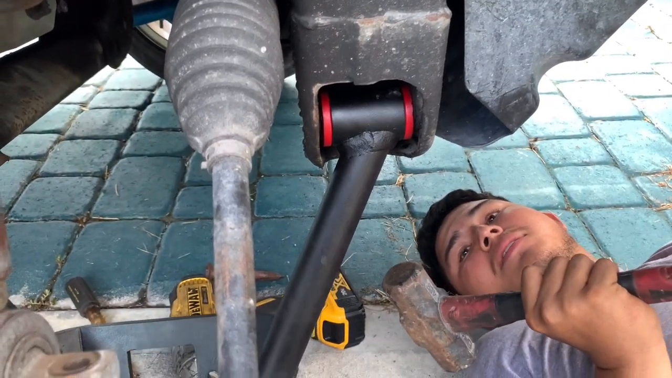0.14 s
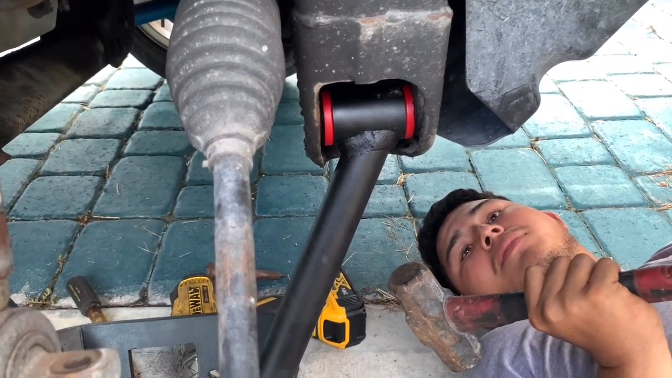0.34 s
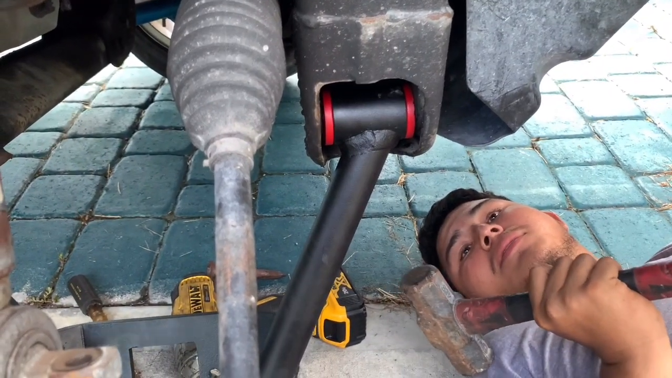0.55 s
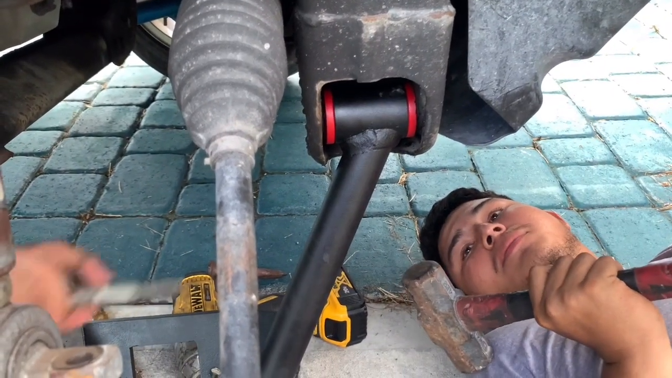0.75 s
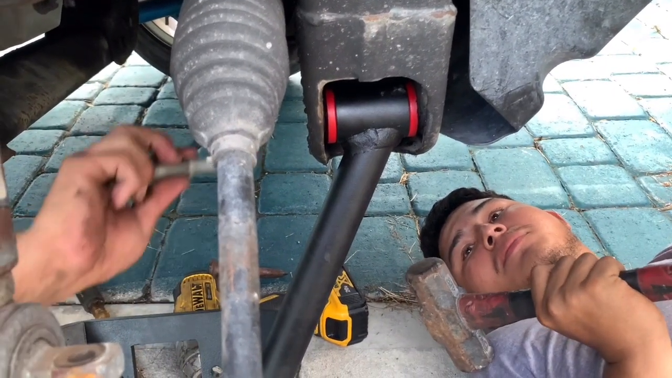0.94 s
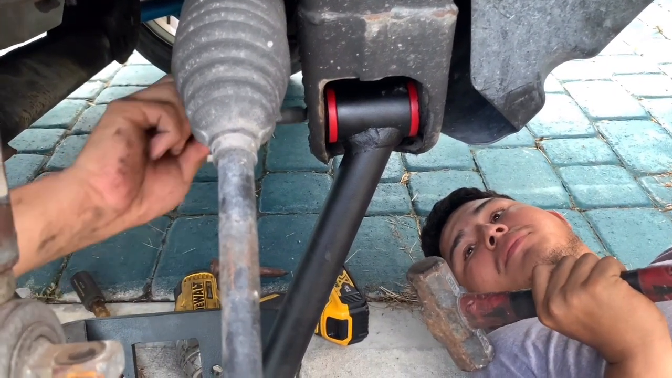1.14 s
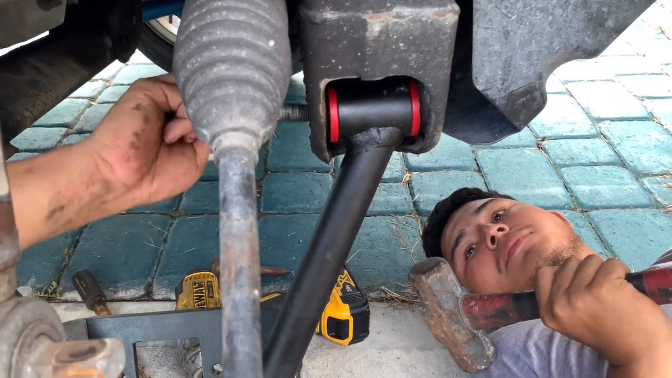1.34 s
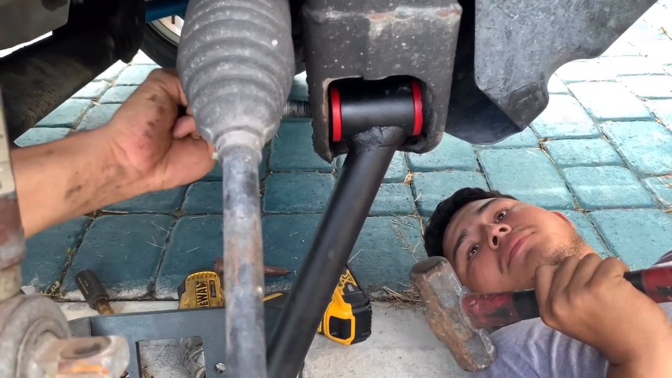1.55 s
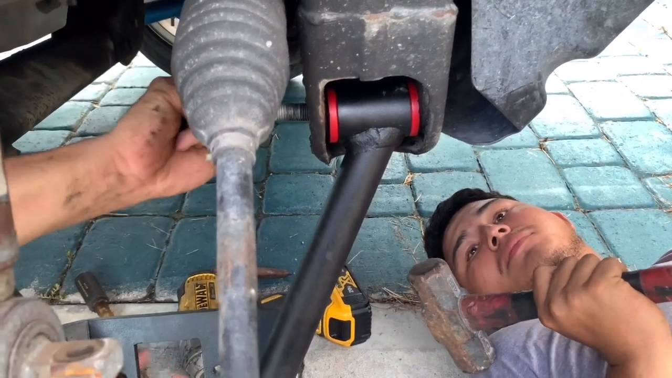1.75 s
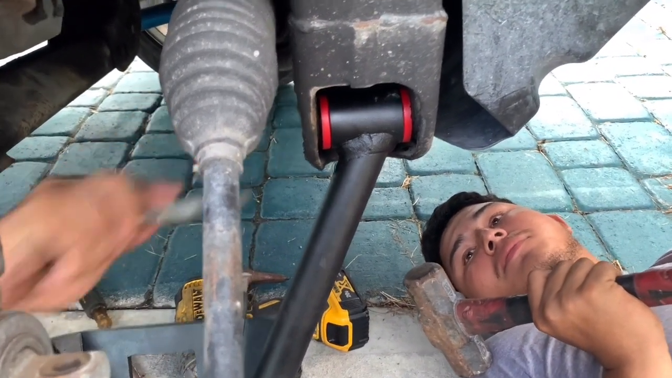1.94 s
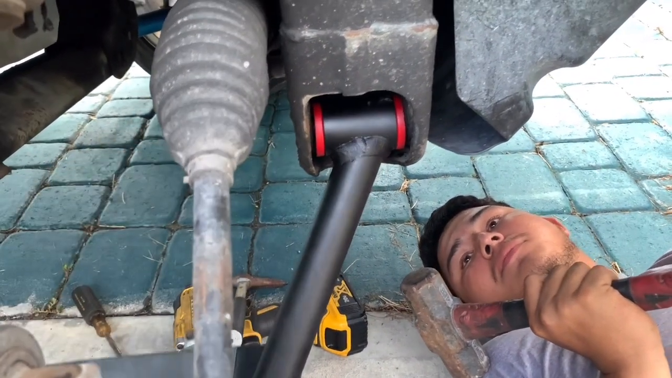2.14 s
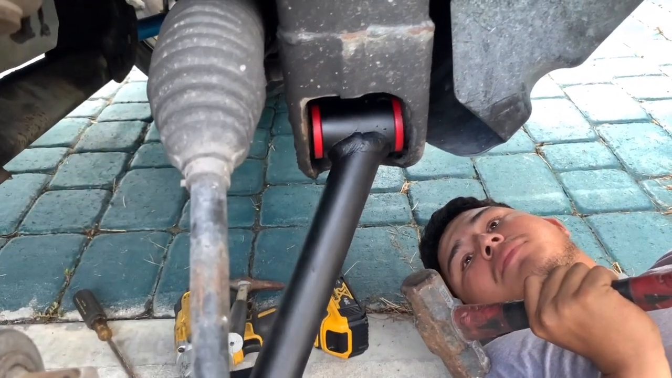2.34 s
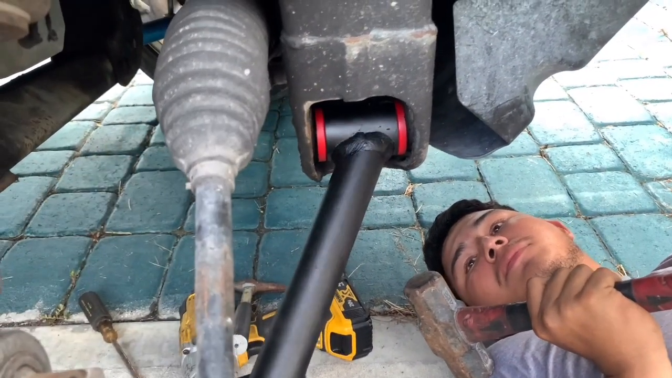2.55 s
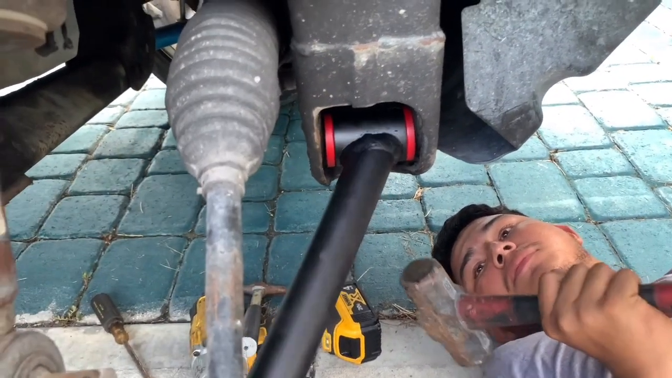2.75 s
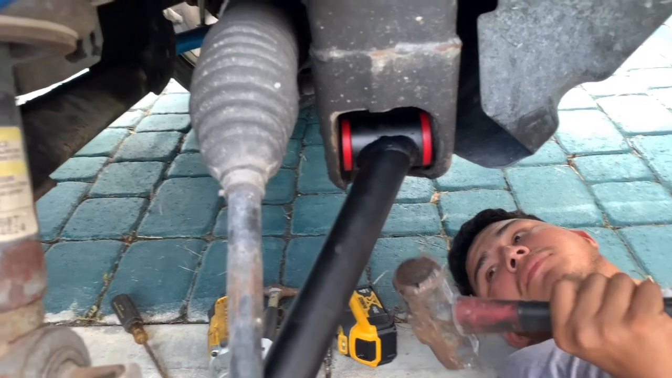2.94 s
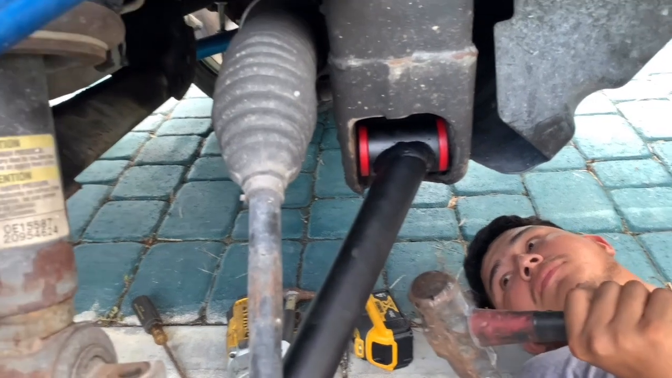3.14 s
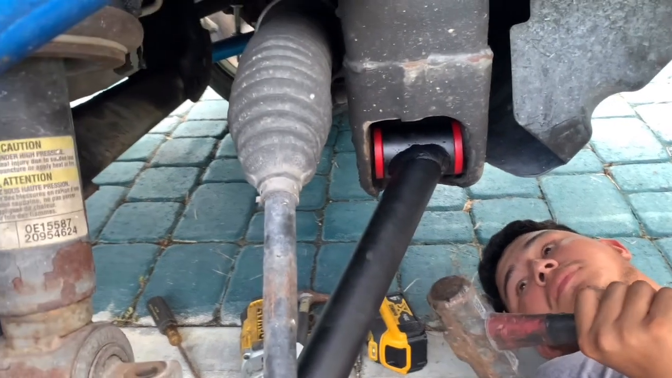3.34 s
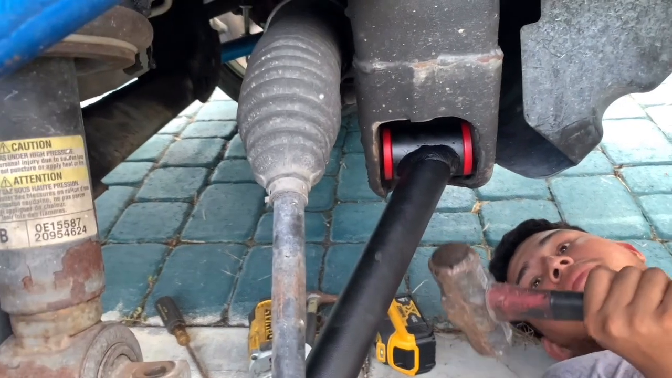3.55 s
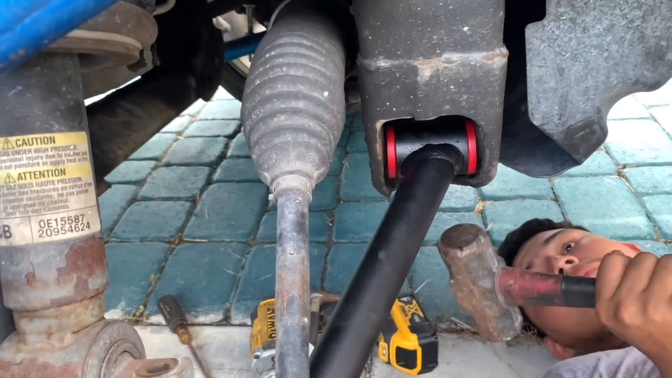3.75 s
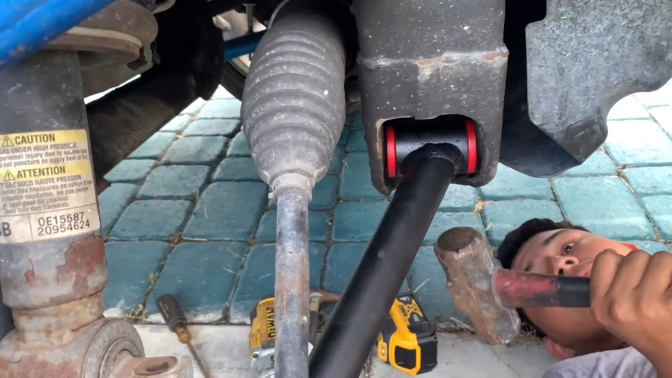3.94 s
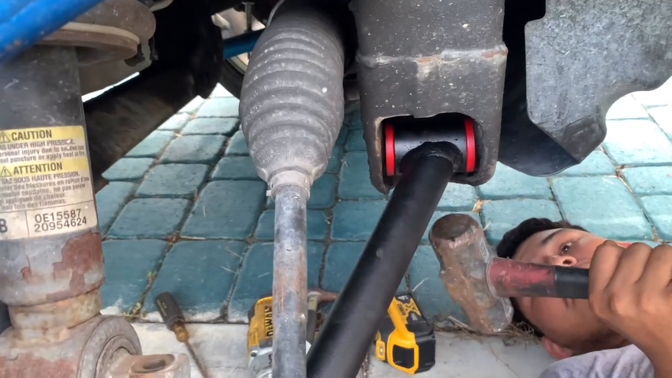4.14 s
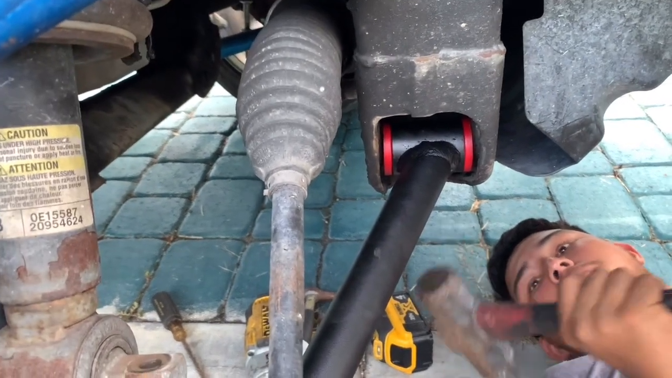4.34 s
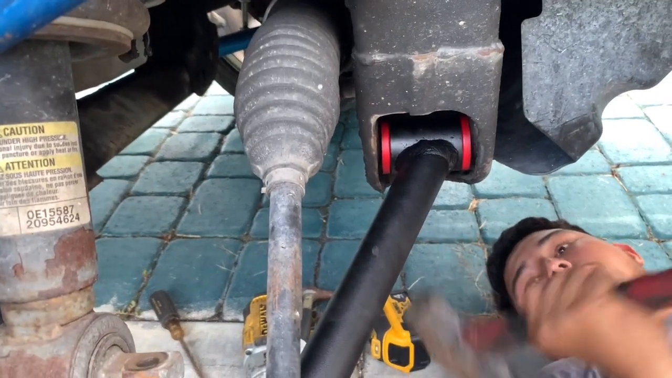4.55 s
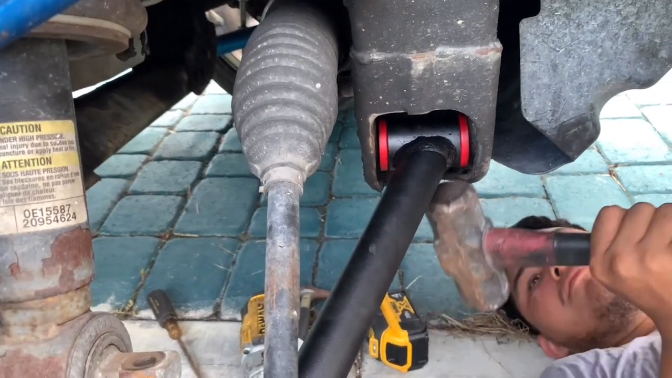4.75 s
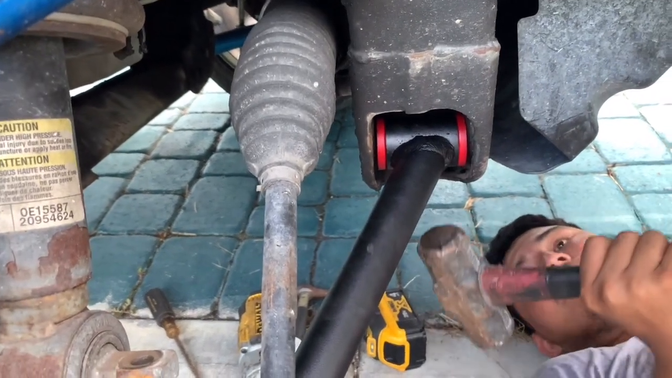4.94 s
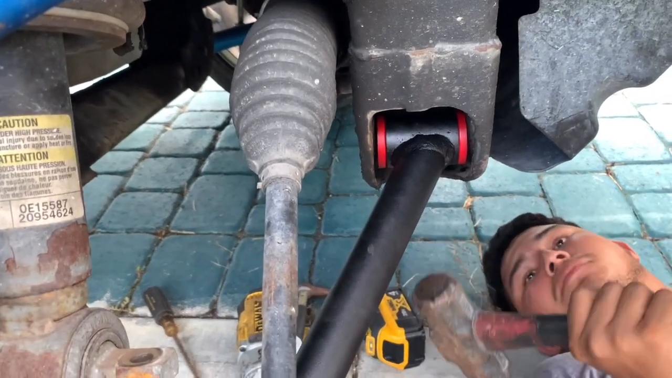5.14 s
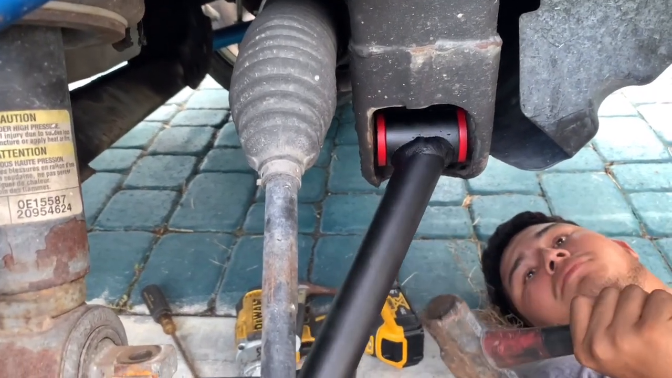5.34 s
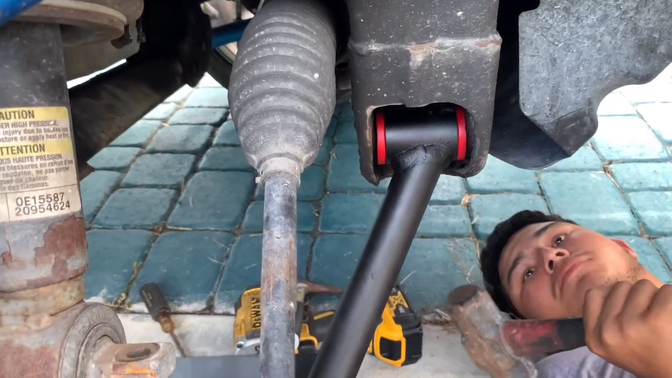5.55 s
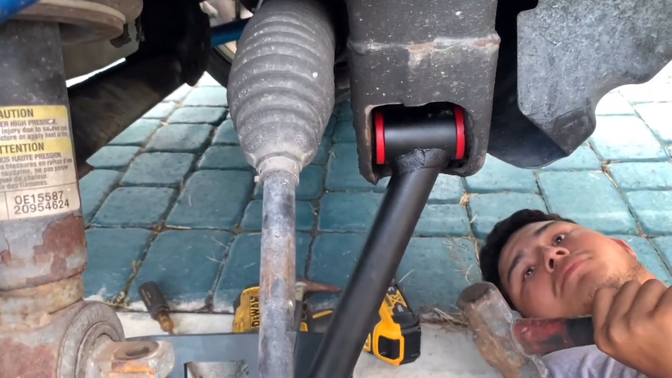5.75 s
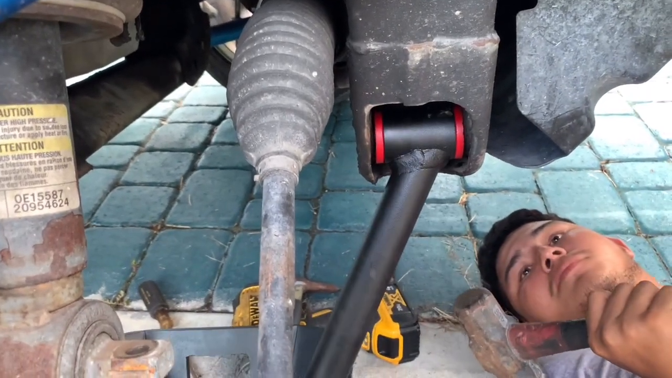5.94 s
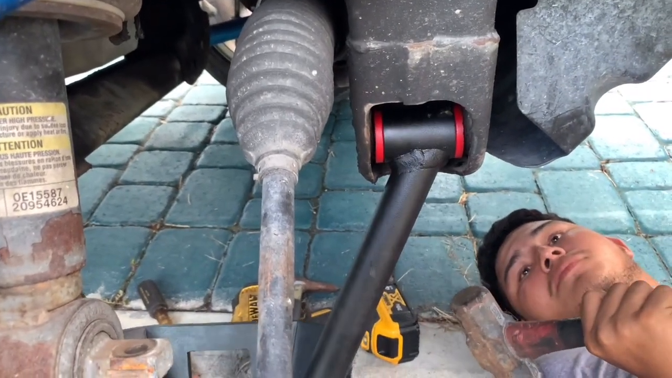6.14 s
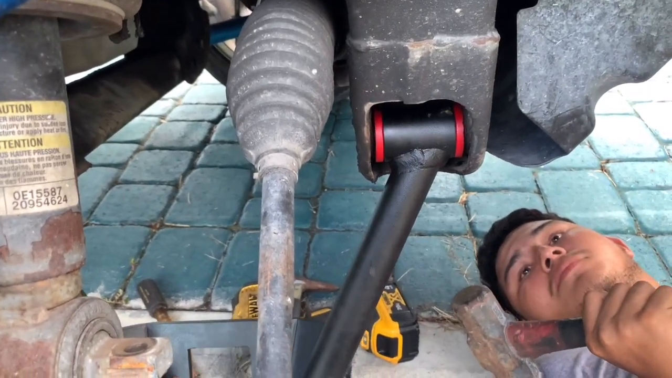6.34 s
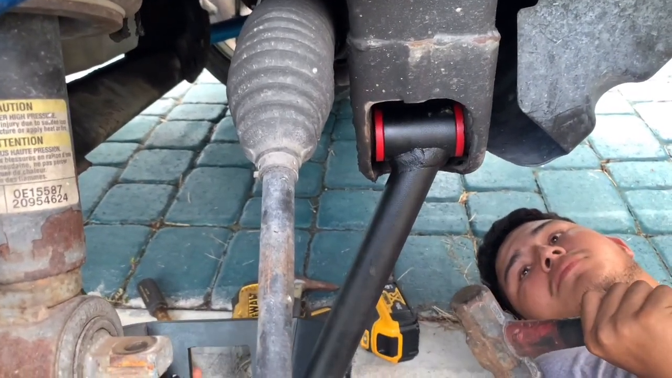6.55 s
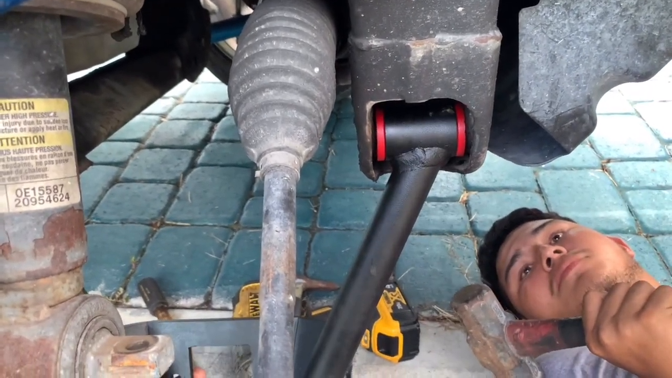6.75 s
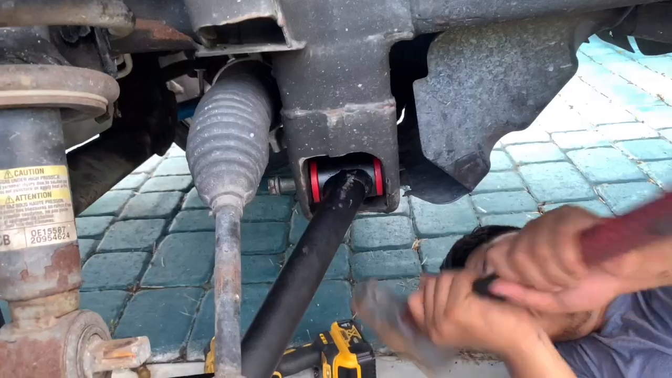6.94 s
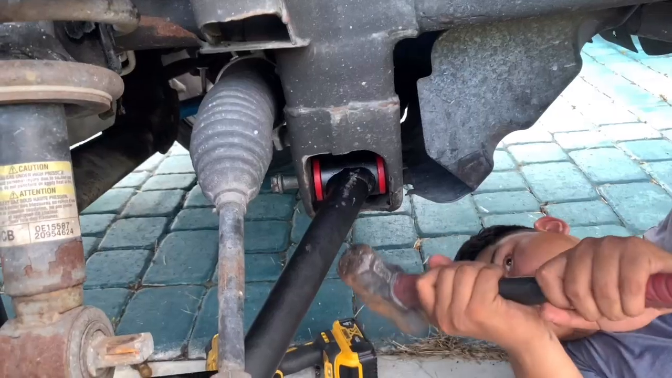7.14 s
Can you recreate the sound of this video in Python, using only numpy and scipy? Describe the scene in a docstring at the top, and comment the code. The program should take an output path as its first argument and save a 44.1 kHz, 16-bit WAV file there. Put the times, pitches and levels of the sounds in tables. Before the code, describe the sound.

Small metal taps from a bolt, then three loud, uneven hammer clanks on steel car parts, rattling briefly over a faint hum outdoors.

```python
"""Hammering a control arm home

Under a car, a bolt is tried in its hole and a heavy hammer drives a steel control arm into its bracket
with three blows: noise through crowded steel modes, plus decaying sines for arm and bracket.
Resonant noise leads into the second and third; the parts rattle and a bushing squeals once (harmonics).
Light knocks jolt the camera, whose spring rings thinly. A machine hums and rumbles under soft air,
a low, uneven swell of reverberation follows each blow, and the walls answer with a soft noise tail."""
import sys
import numpy as np
from scipy import signal
from scipy.fft import rfft, irfft, next_fast_len
from scipy.io import wavfile
from scipy.ndimage import map_coordinates

SR = 44100
rng = np.random.default_rng(int(sys.argv[2]) if len(sys.argv) > 2 else 0)


def store_pcm(level_fs):
    """Save levels as 16-bit WAV."""
    pcm = np.round(np.clip(level_fs, -1, 1) * 32767).astype(np.int16)
    wavfile.write(sys.argv[1], SR, np.atleast_2d(pcm).T)


N = 321048
TIME = np.arange(N) / SR
AGE = TIME[:SR * 3 // 4]  # time since a contact

# hammer blows: (time [s], level [dB], extra knock [dB], extra crack [dB], decay factor, thud [dB],
# arm ring [dB], bracket ring [dB], camera spring [dB])
BLOWS = [(2.8285, -11, 0.5, 6, .82, -8.5, -28.5, -10, -32),
         (4.564, -6, -11, -1.5, 0.46, -17.5, -19.5, -36, -39),
         (6.9711, -8.5, -7, 1.5, 0.74, -18.5, -17, -26, -31)]
# steel regions favoured or starved where each blow lands, a list per blow: (centre [Hz], width [Hz], level [dB])
SPOTS = [
    [(230, 15, 7), (370, 71, 0), (1304, 98, -1), (1570, 60, 4.5), (1770, 78, 5), (3850, 150, 2),
     (9600, 2300, 1.5)],
    [(315, 52, -6.5), (560, 60, -3), (680, 70, -4), (809, 25, 5.5), (1220, 78, 6.5), (1550, 110, 0.5),
     (1839, 99, -5.5), (3650, 200, 2), (10840, 400, 7.5)],
    [(305, 19, 7.5), (770, 29, 10), (980, 170, -3.5), (1329, 83, -5.5), (1705, 91, 8.5), (2040, 140, 6),
     (2650, 200, -0.5), (3150, 130, 1.5), (3650, 160, 7), (8174, 260, 7.5)],
]
# dense steel modes: (frequency [Hz], level [dB per Hz])
STEEL_SPECTRUM = [(50, -24), (75, -8.5), (170, -15), (330, -7.5), (420, -2), (590, -11), (800, -6.5),
                  (1200, -8.5), (1600, -7), (3100, -14), (5000, -23.5), (10400, -21.5), (12000, -31),
                  (16000, -43.5)]
# steel decay before the contact's decay factor: (frequency [Hz], t60 [s])
STEEL_DAMPING = [(100, 1), (400, 0.34), (1000, 0.31), (2500, 0.21), (6000, 0.19), (13000, 0.089)]
# likeness of left and right: (frequency [Hz], correlation)
LEFT_RIGHT_LIKENESS = [(60, 0.89), (130, .91), (290, 0.72), (640, 0.2), (1400, 0), (15000, 0.24)]
# centres of thump, knock, clang and crack [Hz]
BAND_HZ = (120, 600, 2500, 10000)

LOOSE_DETUNE, LOOSE_WANDER = .004, .004  # pitch shares, per contact and while ringing; times `loose`
GRAIN_DB, GRAINS_PER_S = 2.2, 330  # rough faces meet in many tiny hits
MODE_SPACING_HZ, MODE_SPREAD_HZ = 48, 3500  # mean gap between steel modes; doubled at the second frequency
MODE_HALF_WIDTH = .06  # share of the gap

HUM_DB, RUMBLE_DB, AIR_DB = -41.5, -45.5, -58.5  # at first
DROP_START_S, DROP_END_S = 4.45, 5.05  # the background sinks around the second blow and stays lower
HUM_DROP_DB, RUMBLE_DROP_DB, AIR_DROP_DB = 8.5, 9, 7
MAINS_HZ, AIR_DRIFT_DB = 60, .7
DIP_S, DIP_WIDTH_S, DIP_DB = 4.3, 0.063, 9.5  # hum and rumble dip briefly before the second blow

BUMP_DECAY, FRAME_RING_DB = 0.95, -11.5  # ring against the knock
SETTLE_S, SETTLE_BANDS_DB = .052, [1, -22.5, -7.5, -17]  # the frame drops back: thump, knock, clang, crack

SQUEAL_START_S, SQUEAL_END_S, SQUEAL_EDGE_S = 2.91, 3.26, .035  # swells and dies over the edge time
SQUEAL_HZ, SAG_HZ_PER_S, REST_HZ = 1460, 990, 1220  # the pitch sags until the arm rests
SQUEAL_DB, SQUEAL_FADE_DB_PER_S, SQUEAL_FLICKER_DB = -59.75, 24, 3.5  # the grip comes and goes
SQUEAL_JITTER, SQUEAL_WAVER = .016, .002  # fast and slow pitch unsteadiness (shares)

TAP_RISE_S, TAP_DECAY = 0.00125, 0.77
TAP_FALL_DB, RING_REACH = 10.5, 2.47  # loss per octave far from the centre; ring low-pass over the centre
RUB_START_S, RUB_END_S, RUB_DB = 1.766, 1.85, -51  # the bolt scrapes on the way out

THUMP_DB, CLANG_DB = -4, 2  # against a full blow
REBOUND_THUMP_DB, REBOUND_CLANG_DB, REBOUND_DECAY = -8.5, -1.5, .92  # a rebound is duller
THUD_DELAY_S = .004

TOP_HZ = 15900


def amp(db):
    """Decibels to gain."""
    return 10 ** (np.asarray(db) / 20)


def unit(x):
    """Scaled to rms 1."""
    return x / np.sqrt(np.mean(x ** 2) + 1e-20)


def along(points, hz):
    """(Hz, value) points read on a log axis."""
    f, v = np.transpose(points)
    return np.interp(np.log(hz + 1), np.log(f + 1), v)


def wobble(rate_hz):
    """A smooth random curve with rate_hz knots a second."""
    knots = rng.standard_normal(int(N * rate_hz / SR) + 4)
    return map_coordinates(knots, [TIME * rate_hz])


def add(track, s, sound):
    """Mix a sound into the track from time s."""
    part = track[:, round(s * SR):][:, :sound.shape[-1]]
    part += sound[..., :part.shape[-1]]


def filtered(x, response):
    """x times a response of frequency."""
    n = x.shape[-1]
    m = next_fast_len(n + SR // 8)
    return irfft(rfft(x, m) * response(np.fft.rfftfreq(m, 1 / SR)), m)[..., :n]


def colour(points):
    """The gain of a (Hz, dB) spectrum as a function of frequency."""
    return lambda hz: amp(along(points, hz))


def noise(gain, size):
    """Coloured stereo noise of rms 1; mid and side shares set the left-right likeness by frequency."""
    def mid_side_gain(hz):
        turn = np.arccos(np.clip(along(LEFT_RIGHT_LIKENESS, hz), -1, 1)) / 2
        return gain(hz) * np.array([np.cos(turn), np.sin(turn)])

    mid, side = filtered(rng.standard_normal((2, size)), mid_side_gain)
    return unit(np.array([mid + side, mid - side]))


def dying(x, t60s, stretch):
    """Each frequency of x dies at its own speed, its t60 times stretch."""
    hz, t, z = signal.stft(x, SR, nperseg=256)
    t60 = stretch * along(t60s, hz)[:, None]
    return signal.istft(z * amp(-60 * t / t60), SR, nperseg=256)[1][:, :x.shape[-1]]


def resonances(peaks):
    """The causal response of a set of (Hz, width, dB) resonances with alternating signs."""
    return lambda f: sum((-1) ** k * amp(db) * 1j * f * w / (c * c - f * f + 1j * f * w)
                         for k, (c, w, db) in enumerate(peaks))


def ripple(depth_db, spacing_hz):
    """A gain with random peaks and gaps along frequency, shallower in the bass."""
    knots = rng.standard_normal(2000)
    return lambda hz: amp(depth_db * map_coordinates(knots, [hz / spacing_hz], mode="mirror") * hz / (hz + 900))


def comb():
    """A gain with narrow peaks at uneven steps along frequency, like single modes."""
    steps = np.cumsum(rng.uniform(.3, 1.7, 200)) - 1
    edges = MODE_SPREAD_HZ * np.expm1(steps * MODE_SPACING_HZ / MODE_SPREAD_HZ)
    place = lambda hz: np.interp(hz, edges, np.arange(len(edges))) % 1 - .5  # 0 at a mode
    return lambda hz: 1 / np.hypot(1, place(hz) / MODE_HALF_WIDTH)


def favour(spot):
    """The gain of the (Hz, width, dB) regions that one spot of the steel favours or starves."""
    return lambda hz: amp(sum(db * np.exp(-((hz - centre) / width) ** 2) for centre, width, db in spot))


def ring(modes, scatter_db=-1.0, attack=0.00084, loose=1):
    """Sum of decaying sines, rms 1 before attack and scatter; short waves reach the two sides out of step."""
    hz, db, t60 = np.transpose(modes)[:, :, None]
    age = AGE[:int(t60.max() * SR)]
    drift = np.repeat(rng.standard_normal((len(modes), 130)), 256, axis=1)[:, :len(age)]
    sign, start, left, right, detune = rng.standard_normal((len(modes), 5)).T[:, :, None]
    apart = np.arccos(np.clip(along(LEFT_RIGHT_LIKENESS, hz), -1, 1)) * np.sign(sign) / 2
    fade = amp(db - 60 * age / t60) / np.linalg.norm(amp(db)) * np.sqrt(2)
    pitch = hz * (1 + loose * (LOOSE_DETUNE * detune + LOOSE_WANDER * drift))
    phase = 2 * np.pi * (np.cumsum(pitch, axis=1) / SR + start)
    pair = [(amp(scatter_db * size) * fade * np.sin(phase + side * apart)).sum(0)
            for side, size in ((0.96, left), (-0.76, right))]
    onset = 1 - np.exp(-age / attack)
    return np.pad(np.array(pair) * onset, ((0, 0), (0, len(AGE) - len(age))))


def clank(spectrum, t60s, band_dbs, stretch, attack, burst, burst_time, spot=()):
    """One contact: a noise burst through crowded steel modes, coloured by its spot and band levels."""
    modes, strength = comb(), ripple(depth_db=3, spacing_hz=70)
    steel = lambda hz: colour(spectrum)(hz) * modes(hz) * strength(hz) * favour(spot)(hz)
    hits = np.interp(AGE * GRAINS_PER_S, np.arange(GRAINS_PER_S), rng.standard_normal(GRAINS_PER_S))
    grain = unit(amp(GRAIN_DB * hits))
    crowd = filtered(noise(steel, size=len(AGE)), colour(list(zip(BAND_HZ, band_dbs))))
    share = np.clip(burst, 0, .95)
    onset = 1 - np.exp(-AGE / attack)
    early = 1 - share + 2 * share * np.exp(-AGE / burst_time)
    return grain * dying(crowd, t60s, stretch) * onset * early


def background(waver_db=3.0):
    """A machine's wavering hum and rumble under soft outdoor air, coloured by the hollows under the car."""
    # (multiple of the mains, level [dB])
    hum_orders = [(1, 3.5), (2, -13), (3, -20), (4, -21.5), (5, -28), (6, -38.5)]
    # (frequency [Hz], level [dB per Hz])
    rumble_spectrum = [(15, -69), (25, -48.5), (29, -28), (40, -10.5), (64, -7), (87, -6), (123, -5),
                       (167, -18), (246, -17), (317, -32), (450, -42), (580, -72.5), (990, -120)]
    # (frequency [Hz], level [dB per Hz])
    air_spectrum = [(150, -31.5), (250, -6), (440, -22), (471, -14), (652, -19), (736, -18), (1190, -21.5),
                    (1460, -25), (5550, -37.5), (6150, -35), (7300, -44.5), (10600, -47.5), (11800, -59),
                    (13800, -49), (15000, -67.5)]
    sunk = np.clip((TIME - DROP_START_S) / (DROP_END_S - DROP_START_S), 0, 1)
    clock = TIME + 0.00051 * wobble(6.7)
    tone = unit(sum(amp(db + 2.1 * wobble(19)) * np.sin(2 * np.pi * (k * MAINS_HZ * clock + rng.random()))
                    for k, db in hum_orders))
    hum = amp(HUM_DB - HUM_DROP_DB * sunk + waver_db * wobble(9)) * tone
    rumble = amp(RUMBLE_DB - RUMBLE_DROP_DB * sunk) * noise(colour(rumble_spectrum), size=N)
    hollows = ripple(depth_db=1.3, spacing_hz=172.2)
    air_gain = amp(AIR_DB - AIR_DROP_DB * sunk + AIR_DRIFT_DB * wobble(2.6))
    air = air_gain * noise(lambda f: colour(air_spectrum)(f) * hollows(f), size=N)
    dip = amp(-DIP_DB * np.exp(-((TIME - DIP_S) / DIP_WIDTH_S) ** 2))
    return dip * (hum + rumble) * amp([[-1.0], [1.0]]) + air


def walls(x):
    """A soft tail from the walls and paving: convolution with decaying noise."""
    # decay before the stretch: (frequency [Hz], t60 [s])
    wall_t60s = [(100, 0.62), (500, 0.59), (1500, 0.24), (3000, 1), (6000, .4), (12000, .2)]
    # (frequency [Hz], level [dB])
    wall_colour = [(100, -3.5), (500, 8), (1400, -3), (3000, -22.5), (7000, -24), (14000, -26.5)]
    tail = dying(noise(colour(wall_colour), size=len(AGE)), wall_t60s, stretch=0.89)
    tail = tail * (1 - np.exp(-AGE / 0.013))
    return signal.fftconvolve(x, unit(tail) / np.sqrt(len(AGE)), axes=1)[:, :N]


def late_swells():
    """A low, uneven swell of reverberation follows each blow: resonant noise that rises and fades."""
    # (peak time [s], rise [s], fall [s], level [dB], dull above [Hz])
    swells = [(3.0, 0.063, 0.14, -48, 1400), (4.815, .1, 0.097, -46.5, 1750),
              (7.155, .085, 0.091, -49, 1610)]
    # tail resonances: (centre [Hz], width [Hz], level [dB])
    tail_peaks = [(160, 120, -3.5), (248, 30, 0.5), (420, 38, 2), (654, 50, -0.5), (860, 25, -4),
                  (1170, 120, -4), (1450, 29, -3.5), (2250, 400, -18)]
    out = np.zeros((2, N))
    for s, rise, fall, db, dull_hz in swells:
        modes = comb()
        tail_colour = lambda hz: (resonances(tail_peaks)(hz) * modes(hz) * hz / (hz + 90)
                                  / np.hypot(1, (hz / dull_hz) ** 2))
        t = AGE - 3 * rise  # 0 at the peak
        swell = np.exp(-(np.minimum(t, 0) / rise) ** 2 / 2 - np.maximum(t, 0) / fall)
        uneven = amp(db + 2 * wobble(70)[:len(AGE)])
        add(out, s + t[0], uneven * swell * noise(tail_colour, size=len(AGE)))
    return out


def jolts():
    """Dull frame knocks reach the camera; these and the blows ring a tiny spring inside it."""
    # knocks on the frame beside the camera: (time [s], level [dB], camera spring [dB])
    bumps = [(0.1053, -22, -38.5), (6.186, -33, -63.5), (6.287, -54.5, -36.5)]
    # thump, knock, clang and crack of a knock [dB]
    bump_bands_db = [-6, -2.5, 2, 2.5]
    # the knocked frame: (frequency [Hz], level [dB per Hz])
    frame_spectrum = [(53, -26), (100, -12.5), (165, -10.5), (250, -1), (330, -13), (480, -8.5), (750, -20),
                      (1300, -22.5), (1920, -30.5), (2760, -27), (4500, -37), (5600, -31), (10500, -32),
                      (13000, -38), (16000, -58)]
    # decay before the decay factor: (frequency [Hz], t60 [s])
    frame_damping = [(120, 0.58), (300, 0.52), (600, 0.32), (1500, 0.24), (6000, 0.13), (13000, 0.073)]
    # (frequency [Hz], level [dB], t60 [s])
    frame_modes = [(137.4, -4, 0.48), (210, -5, 0.6), (241.5, -2.5, 0.7), (293, -3.5, 0.49),
                   (473, -2, 0.55), (544, -7.5, 0.55), (650, 0.5, 0.26), (1670, -10, 0.17),
                   (2630, -1, 0.094), (5480, -2.5, 0.085)]
    # (frequency [Hz], level [dB], t60 [s])
    spring_modes = [(12570, 0, .18), (12635, -12, .24)]
    out = np.zeros((2, N))
    for s, db, _ in bumps:
        for delay, band_dbs in ((0, bump_bands_db), (SETTLE_S, SETTLE_BANDS_DB)):
            knock = clank(frame_spectrum, frame_damping, band_dbs, BUMP_DECAY,
                          attack=0.0017, burst=0.26, burst_time=0.00166)
            add(out, s + delay, amp(db) * knock)
        add(out, s, amp(db + FRAME_RING_DB) * ring(frame_modes, attack=0.0045, loose=1.43))
    for s, *_, spring_db in bumps + BLOWS:
        add(out, s + 0.0018, amp(spring_db) * ring(spring_modes, loose=.15))
    return out


def squeal():
    """The bushing squeals faintly at a falling pitch as the arm settles, sticking and slipping unevenly."""
    # (multiple of the pitch, level [dB])
    orders = [(2, -1.5), (3, -12.5), (4, -21), (5, -11), (6, -13.5)]
    age = np.maximum(TIME - SQUEAL_START_S, 0)
    hz = np.maximum(SQUEAL_HZ - SAG_HZ_PER_S * age, REST_HZ)
    unsteady_hz = hz * (1 + SQUEAL_JITTER * wobble(1300) + SQUEAL_WAVER * wobble(58))
    phase = 2 * np.pi * np.cumsum(unsteady_hz) / SR
    sounding = np.clip(np.minimum(age, SQUEAL_END_S - TIME) / SQUEAL_EDGE_S, 0, 1)
    grip_db = SQUEAL_DB - SQUEAL_FADE_DB_PER_S * age + SQUEAL_FLICKER_DB * wobble(36)
    tone = sum(amp(db + 3 * wobble(70)) * np.sin(k * phase) for k, db in orders)
    return sounding * amp(grip_db) * tone


def touch(db, centre_hz, ring_db, rise, stretch):
    """One contact of the bolt, strongest around its centre frequency; a low centre dulls its ring."""
    # bolt modes: (frequency [Hz], level [dB], t60 [s])
    bolt_modes = [(721, 0, 0.093), (831.3, 1, 0.23), (1490, -18, 0.26), (1636, -9, 0.24),
                  (2132, -15.5, 0.32), (2475, -13, 0.17), (2980, -20, 0.14), (3660, 6, 0.05),
                  (9800, -15.5, 0.31)]
    octaves = np.log2(np.array(BAND_HZ) / centre_hz)
    band_dbs = db - TAP_FALL_DB * (np.hypot(octaves, 1) - 1)
    click = clank(STEEL_SPECTRUM, STEEL_DAMPING, band_dbs, stretch, attack=rise, burst=0.38, burst_time=0.0092)
    low_pass = lambda hz: 1 / (1 + 1j * hz / (RING_REACH * centre_hz)) ** 2
    return click + amp(ring_db) * filtered(ring(bolt_modes, attack=rise), low_pass)


def bolt(catch_db=1.0):
    """The bolt clicks against the rim of its hole; its thread catches and scrapes as it is drawn out."""
    # taps, hard contacts centred higher than soft ones: (time [s], level [dB], centre [Hz], bolt ring [dB])
    taps = [(1.17, -40, 11000, -75), (1.173, -41.5, 510, -42), (1.187, -38.5, 427, -36),
            (1.289, -33.5, 1220, -30.5), (1.321, -30.5, 1400, -29.5), (1.839, -32.5, 6560, -73),
            (1.9547, -40, 4970, -80), (2.191, -53.5, 4500, -80)]
    # scrape resonances: (centre [Hz], width [Hz], level [dB])
    thread_peaks = [(824, 47, 3.5), (2150, 450, -11), (3780, 270, -13.5), (9700, 220, -12),
                    (10600, 1300, -25.5)]
    out = np.zeros((2, N))
    for s, *contact in taps:
        add(out, s, touch(*contact, TAP_RISE_S, TAP_DECAY))
    stroke = np.sin(np.pi * np.clip((TIME - RUB_START_S) / (RUB_END_S - RUB_START_S), 0, 1))
    scrape = amp(RUB_DB + catch_db * wobble(190)) * noise(resonances(thread_peaks), size=N)
    return out + stroke * scrape


def lead_ins(growth=2.02, release=0.0064, pan_db=3.5):
    """Resonant noise swells for about 20 ms into the second and third blows."""
    # (start [s], end s [s], level [dB])
    swells = [(4.539, 4.561, -10.5), (6.955, 6.976, -13)]
    # swell resonances: (centre [Hz], width [Hz], level [dB])
    swell_peaks = [(390, 150, -12.5), (1330, 56, -1), (1590, 90, -5), (1930, 76, -8), (2550, 96, -2),
                   (3200, 220, 0.5), (4570, 730, -13), (6180, 540, -11.5), (6733, 130, -14.5),
                   (7830, 140, -12)]
    out = np.zeros((2, N))
    for (start, end, db), spot in zip(swells, SPOTS[1:]):
        band = lambda f: f ** 2 / (f ** 2 + 300 ** 2) / (1 + (f / 8500) ** 10)
        swell_colour = lambda f: resonances(swell_peaks)(f) * favour(spot)(f) * band(f)
        length = end - start
        level = np.minimum(AGE / length, 1) ** growth * np.exp(-np.maximum(AGE - length, 0) / release)
        add(out, start, amp(db) * level * noise(swell_colour, size=len(AGE)))
    return out * amp([[-pan_db], [pan_db]])


def thud():
    """The bushing takes the load: one low push that dies within a few cycles."""
    # (frequency [Hz], level [dB], rise [s])
    pushes = [(378, -2, 0.0014), (810, -6, 0.0005)]
    return sum(amp(db) * AGE / rise * np.exp(1 - AGE / rise) * np.sin(2 * np.pi * hz * AGE)
               for hz, db, rise in pushes)


def strike(band_dbs, spot, stretch, arm_db, bracket_db, arm_pan_db=0.1, bracket_pan_db=1.14):
    """Steel meets steel: a clank, and the ring of the arm and of the bracket."""
    # (frequency [Hz], level [dB], t60 [s])
    arm_modes = [(253.6, -14.5, 0.37), (394, -6, 0.12), (773, -6.5, 0.12), (488, -10, 0.23),
                 (815, -5.5, 0.11), (1062, -10, 0.17), (1152, -8, 0.15), (1300, -12, 0.17),
                 (1360, -2, 0.17), (1462, -1, 0.15), (1677, -3, 0.13), (1920, -1.5, 0.14),
                 (2157, -0.5, .14), (2225, -5, 0.13), (2380, -3.5, 0.13), (2454, 0, 0.17),
                 (2940, -5.5, 0.26), (3100, -7, 0.094), (3270, 3, 0.067), (3590, -8.5, .085),
                 (3660, -3.5, .085), (4450, -3.5, 0.087), (4880, -3, 0.049), (5990, -13, .12),
                 (6300, -9, 0.071), (7100, -13.5, 0.083), (7900, -18, 0.11)]
    # (frequency [Hz], level [dB], t60 [s])
    bracket_modes = [(233, -11.5, 0.15), (284, -7.5, 0.36), (333, -8.5, .38), (384.8, 3.5, .06),
                     (429.2, -2.5, 0.26), (528, -2.5, 0.19), (676.2, -8, 0.34), (774, 1.5, 0.18),
                     (815, -1, .2), (851, -2, 0.29), (919, 1.5, 0.19), (962, 6, 0.092), (1017, 1, 0.17),
                     (1290, -4, 0.035), (1531, -0.5, 0.16), (1780, -4.5, 0.16), (1844, -0.5, 0.099),
                     (2130, -6, .15), (2266, -4.5, 0.21), (2480, -6.5, 0.16), (3036, 1, 0.14),
                     (3130, -6, 0.18), (3560, -6.5, 0.11), (5600, -16.5, 0.12), (6540, -5.5, 0.15),
                     (8134, -14, 0.16), (9430, -7.5, 0.11)]
    contact = clank(STEEL_SPECTRUM, STEEL_DAMPING, band_dbs, stretch,
                    attack=0.0017, burst=0.48, burst_time=0.0079, spot=spot)
    arm_gain = amp([[arm_db - arm_pan_db], [arm_db + arm_pan_db]])
    bracket_gain = amp([[bracket_db + bracket_pan_db], [bracket_db - bracket_pan_db]])
    return contact + arm_gain * ring(arm_modes, attack=0.006) + bracket_gain * ring(bracket_modes, attack=0.0015)


def hammer():
    """Blows and their weaker rebounds; after the first blow the arm hangs free and sings on."""
    # parts meet again on the last blow's spot: (time [s], level against that blow [dB], extra knock [dB],
    # extra crack [dB], extra ring [dB])
    rebounds = [(2.8521, -11.5, 4.5, -4, -14.5), (2.864, -11, -0.5, -2, -4), (2.891, -23, -4.5, -0.5, -6),
                (4.586, -17.5, -3.5, -2.5, 12), (4.621, -21, 3, -6.5, 10), (4.643, -32, 6.5, -12, -5),
                (7.022, -33.5, 14, -2, -3), (7.035, -31.5, -11, -1, 8)]
    # slow modes of the hanging arm: (frequency [Hz], level [dB], t60 [s])
    hanging_modes = [(670, -4, .6), (1153, -3, 0.77), (1486, 1, 1.0), (2985, -8, 1)]
    out = np.zeros((2, N))
    for (s, db, knock_db, crack_db, stretch, thud_db, arm_db, bracket_db, _), spot in zip(BLOWS, SPOTS):
        band_dbs = db + np.array([THUMP_DB, knock_db, CLANG_DB, crack_db])
        add(out, s, strike(band_dbs, spot, stretch, arm_db, bracket_db))
        add(out, s + THUD_DELAY_S, amp(thud_db) * thud())
    for s, loss_db, knock_db, crack_db, ring_db in rebounds:
        last_blow, spot = [pair for pair in zip(BLOWS, SPOTS) if pair[0][0] < s][-1]
        _, db, *_, arm_db, bracket_db, _ = last_blow
        band_dbs = db + np.array([REBOUND_THUMP_DB, knock_db, REBOUND_CLANG_DB, crack_db])
        contact = strike(band_dbs, spot, REBOUND_DECAY, arm_db + ring_db, bracket_db + ring_db)
        add(out, s, amp(loss_db) * contact)
    add(out, BLOWS[0][0], amp(-38.5) * ring(hanging_modes, loose=0))
    return out


def scene():
    """Work on the arm, its reverberation and the background."""
    # balance of blows and lead-ins: (frequency [Hz], left over right [dB])
    lean = [(100, -1), (300, -1.5), (640, 0.5), (1400, 0), (3100, -1), (6000, -3.5), (14000, -.5)]
    blows = filtered(hammer() + lead_ins(), lambda hz: amp(along(lean, hz) * np.array([[.5], [-.5]])))
    work = blows + bolt()
    return work + amp(-26.0) * walls(work) + late_swells() + squeal() + jolts() + background()


def record(dry):
    """The camera rounds off the highest peaks and keeps nothing above its band limit."""
    rounded = dry / (1 + np.abs(dry / .95) ** 6) ** (1 / 6)
    return filtered(rounded, lambda hz: hz < TOP_HZ)


dry = scene()
out = record(dry)
store_pcm(out)
```